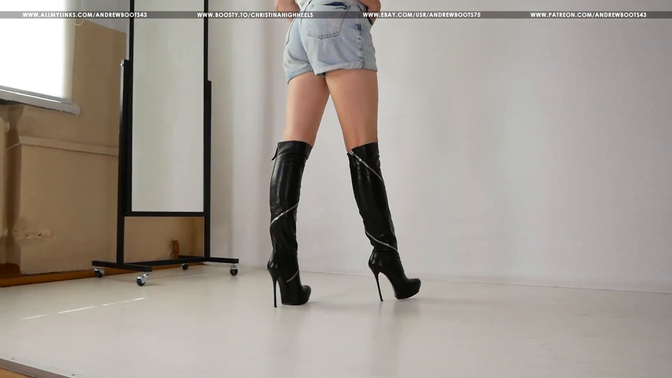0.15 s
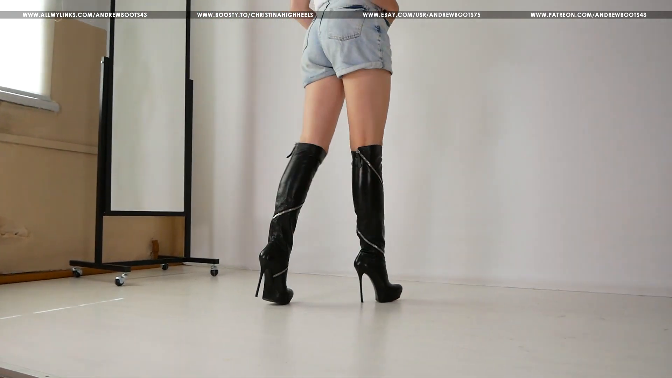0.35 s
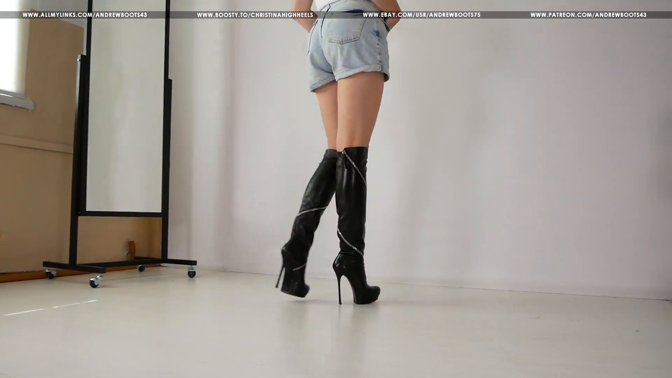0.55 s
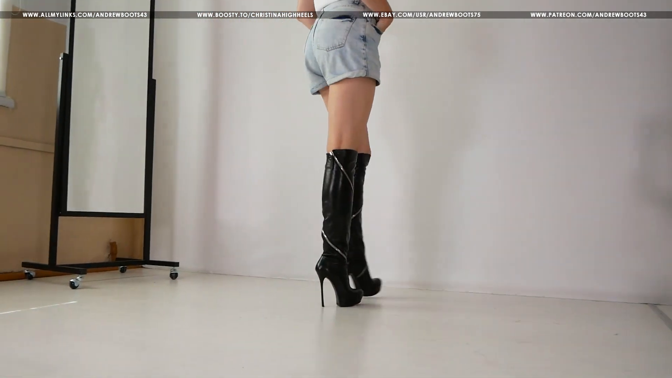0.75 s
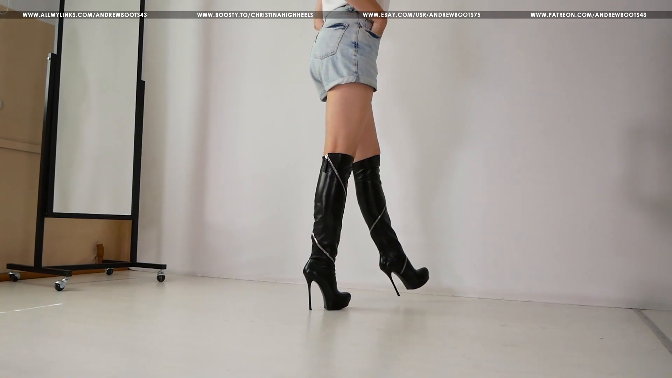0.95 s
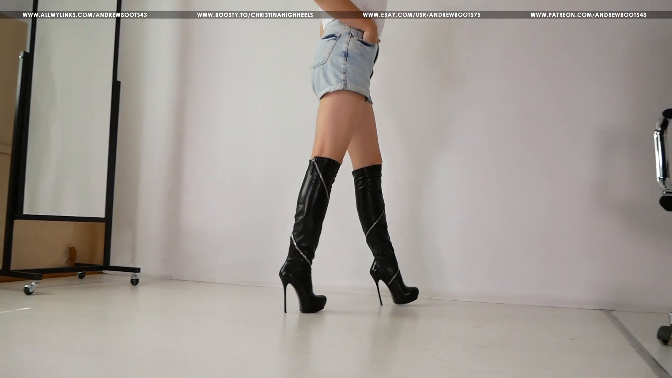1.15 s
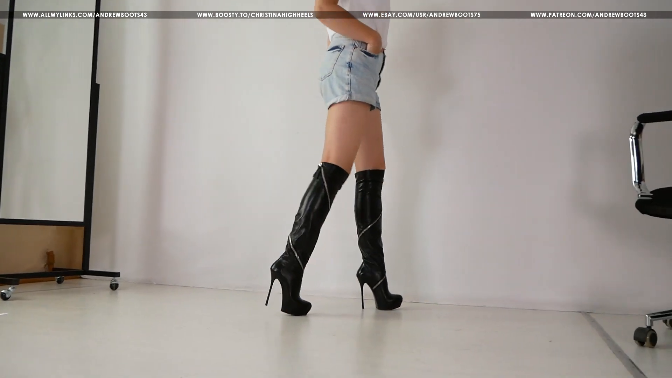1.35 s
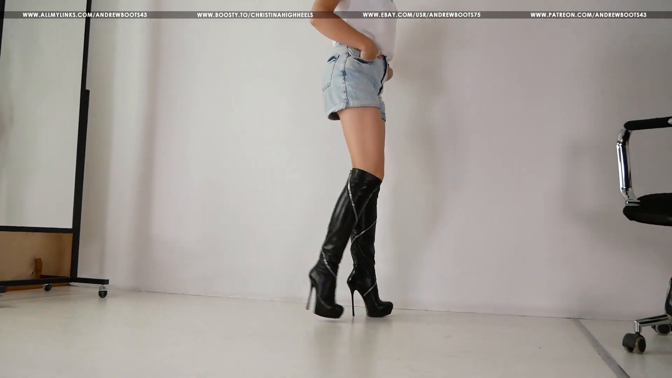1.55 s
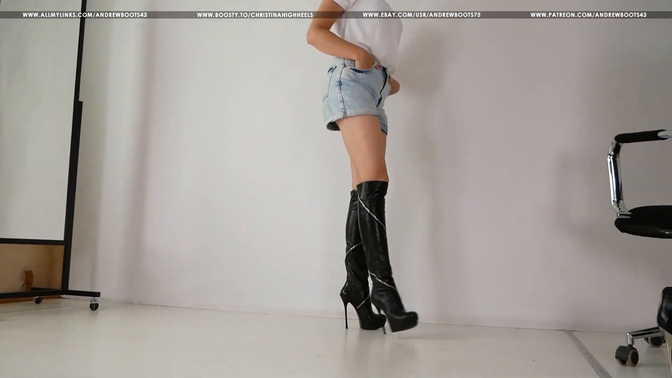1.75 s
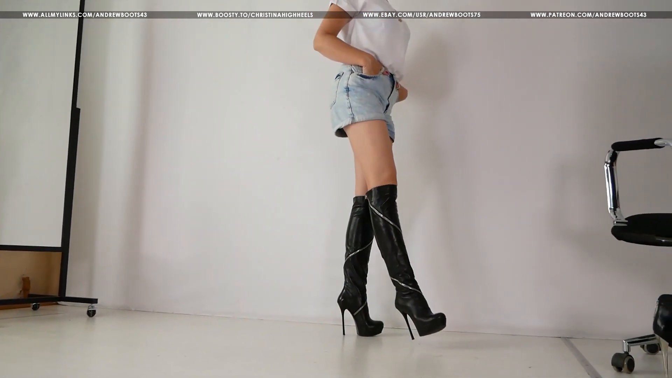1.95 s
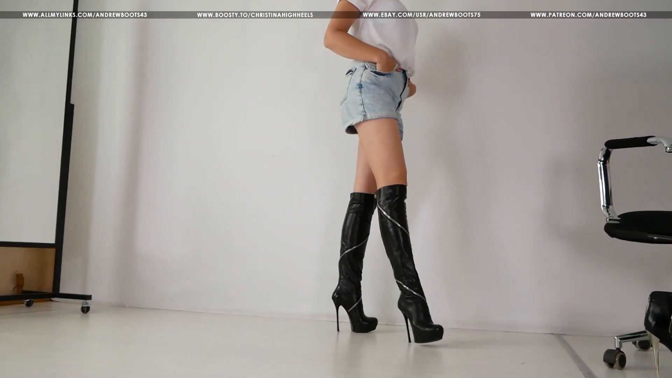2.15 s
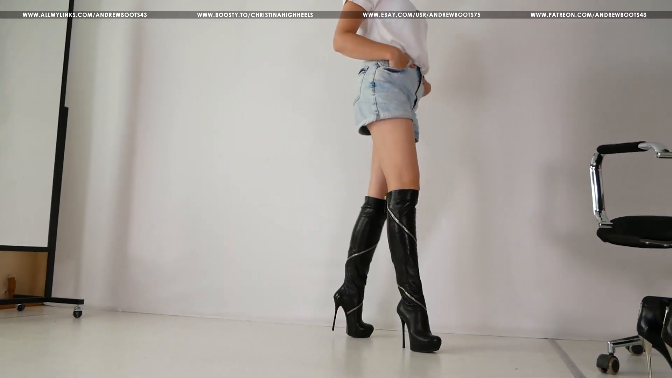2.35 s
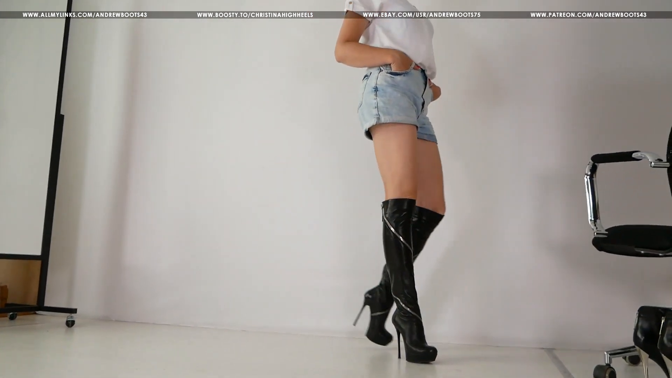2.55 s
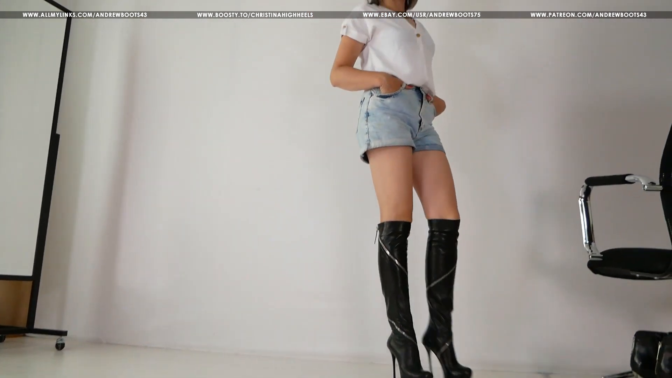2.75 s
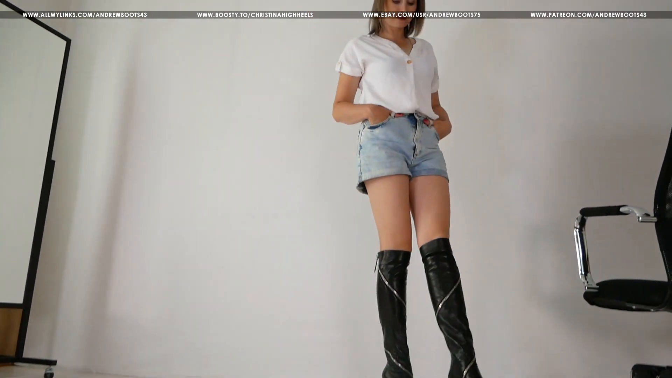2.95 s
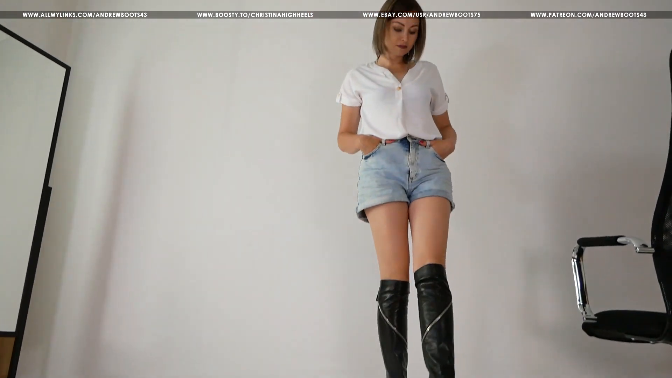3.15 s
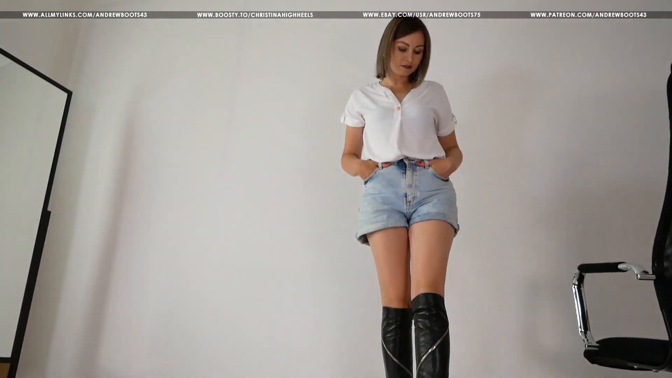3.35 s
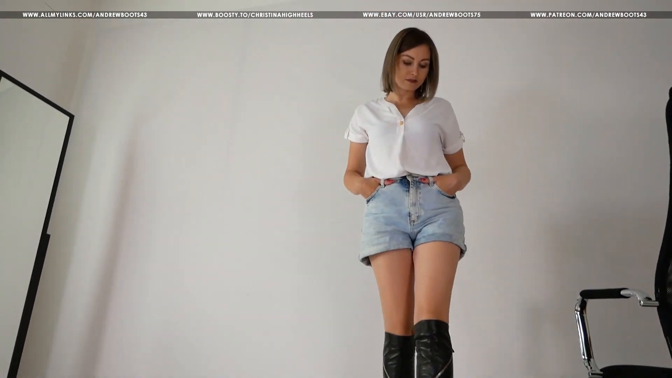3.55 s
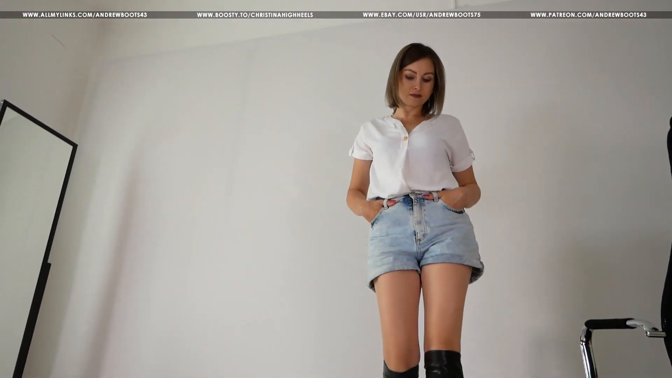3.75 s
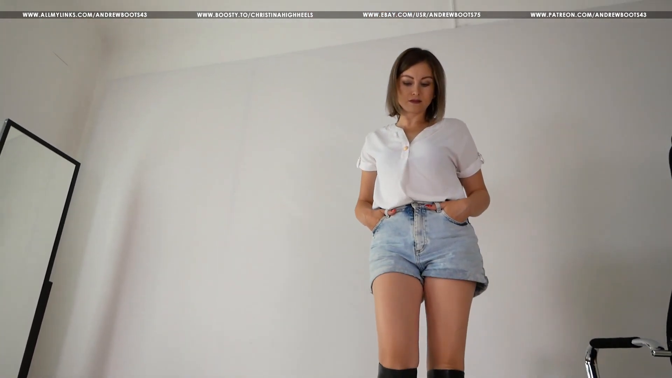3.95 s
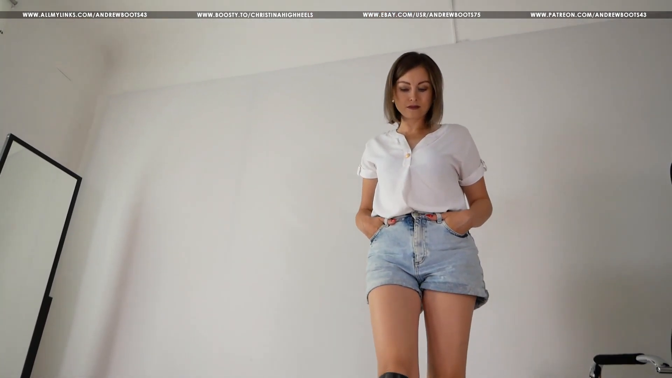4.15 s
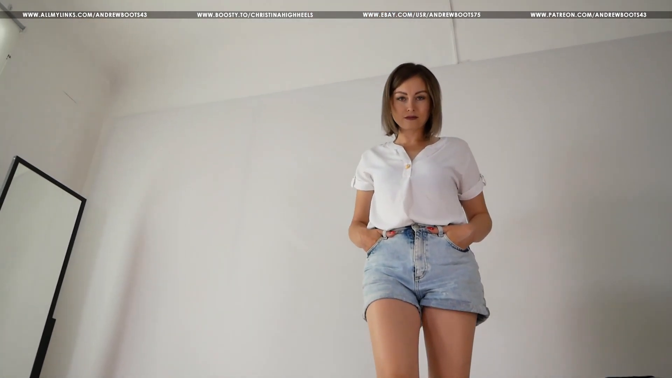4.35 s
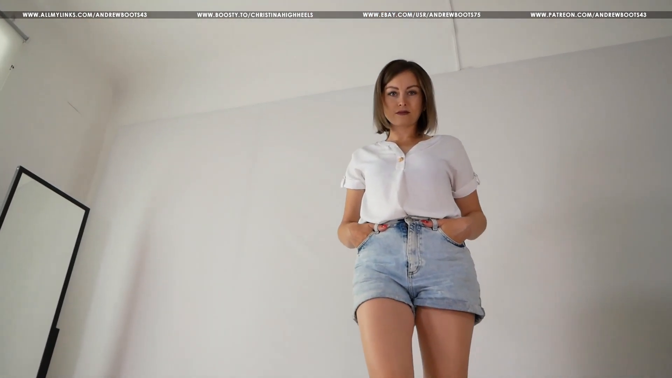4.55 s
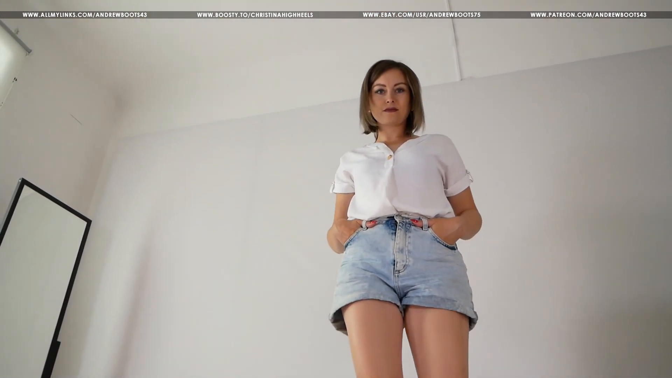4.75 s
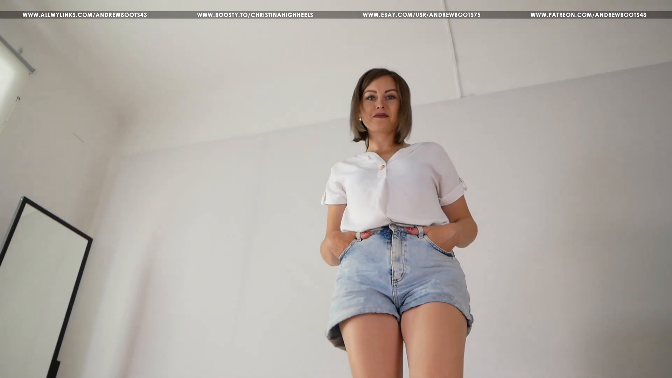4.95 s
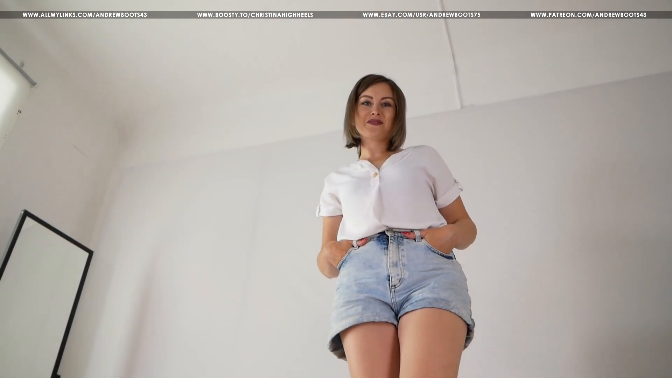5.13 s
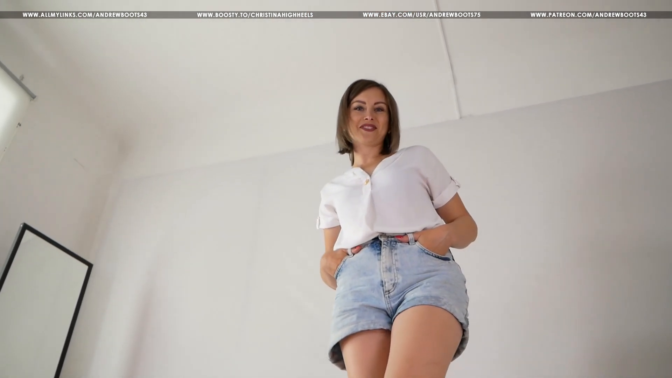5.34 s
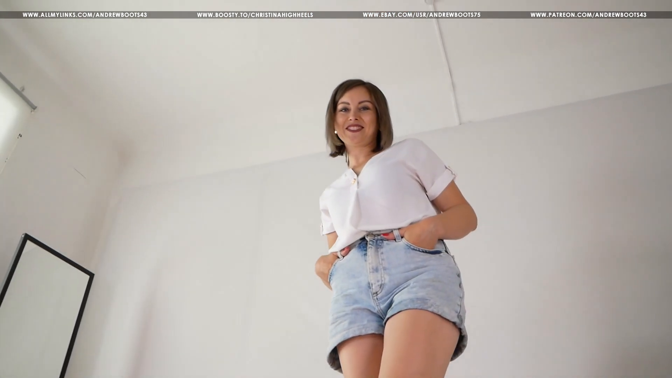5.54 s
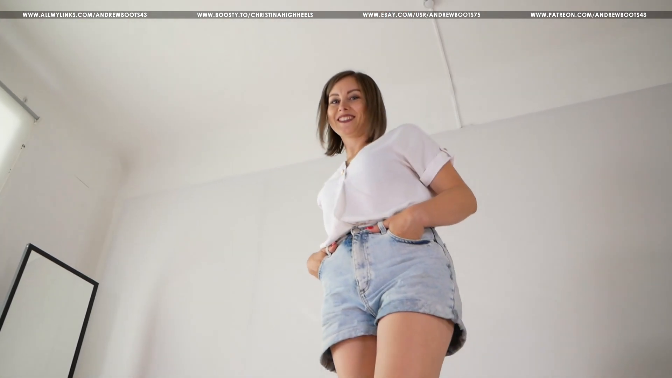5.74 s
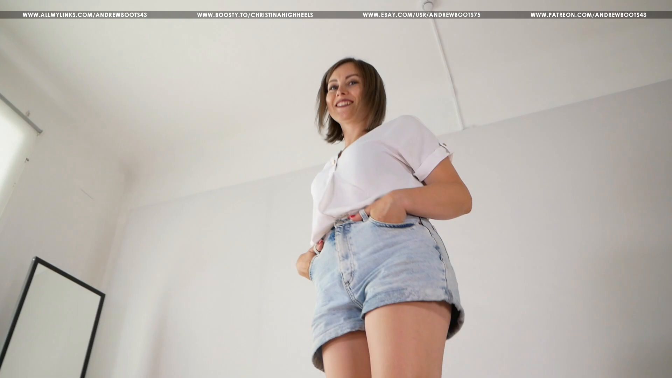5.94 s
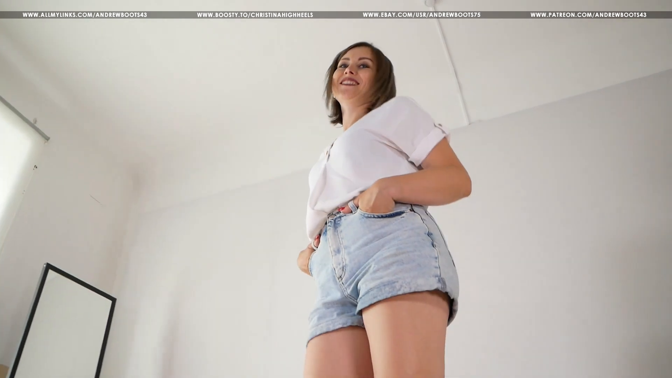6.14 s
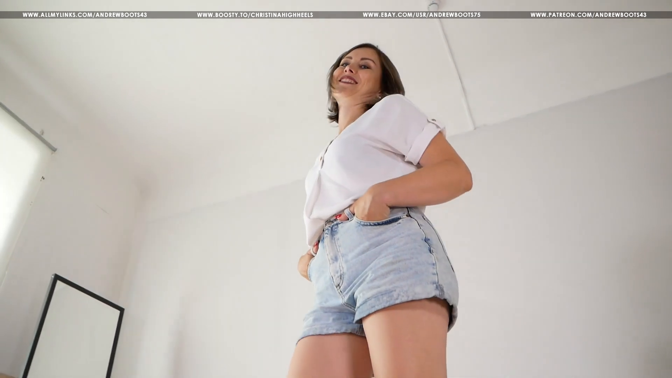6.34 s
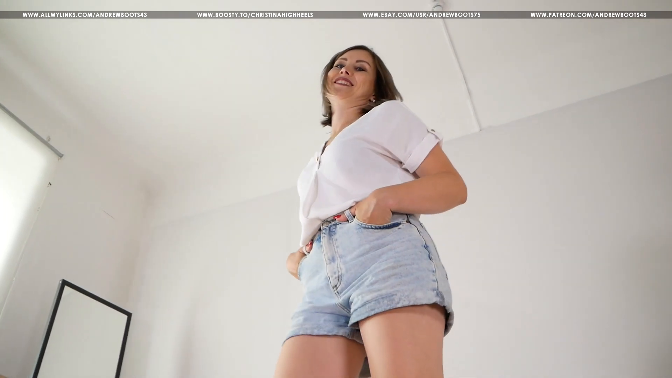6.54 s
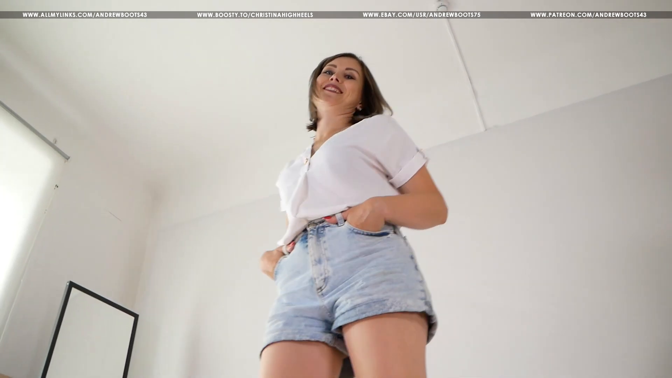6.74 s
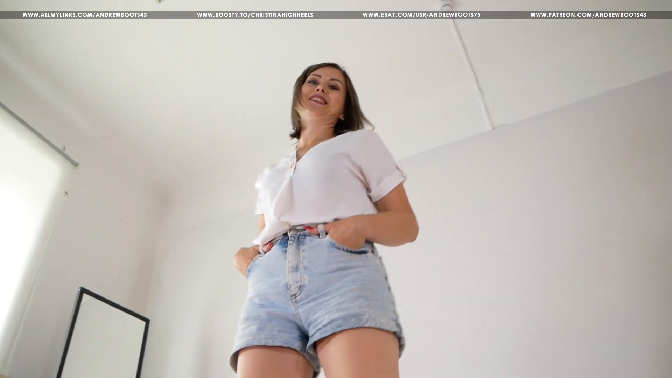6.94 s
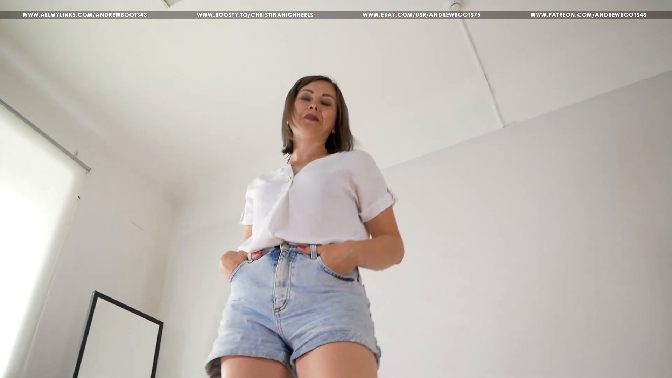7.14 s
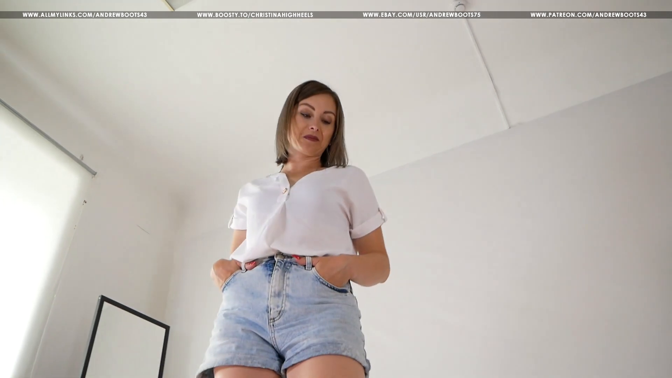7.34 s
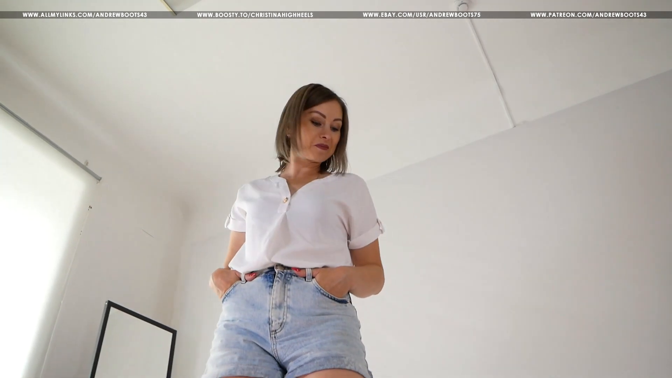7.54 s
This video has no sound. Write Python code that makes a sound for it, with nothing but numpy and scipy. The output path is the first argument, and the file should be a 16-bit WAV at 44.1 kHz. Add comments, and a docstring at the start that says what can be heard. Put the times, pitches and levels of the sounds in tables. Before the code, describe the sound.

A large bare room with hard walls, a soft low air tone and faint hiss. A stiletto heel strikes the hard floor at 0.2 s: sharp click, hollow boot knock, low floor thump, then a dull sole slap about 0.1 s later and a ring fading over roughly a second. Leather rustles and hisses as the leg swings; at 1.0 s there is a tiny rough double squeak with a scuff. The second strike, at 1.2 s, is the farthest and boomiest. Further steps at 2.2, 3.5, 4.5, 5.6 and 6.8 s come progressively closer, with clearer attacks. A short scuff falls at 3.05 s, and small leather ticks scatter from 3.2 s, clustering around 5.0-5.4 s as the background dips slightly. Dull sole scuffs and a creasing rub come at 6.3 s, a faint tick at 6.6 s, and a last soft scuff at 7.5 s under the final step's fading echo.

```python
"""Seven slow steps in stiletto boots across a bare, echoing studio, closer and closer from the second on.
Each heel bends the hard floor: the wave arrives treble first as a quick falling chirp, the boot knocks,
the floor booms, the nearest walls answer, the sole follows, the room rings on.
Between the steps the boots tick, squeak and scuff: filtered noise bursts and a rough two-part note.
Clothes rustle, as grainy filtered noise, over a quiet room tone."""
import sys
import numpy as np
from scipy import signal
from scipy.fft import rfft, irfft, next_fast_len
from scipy.io import wavfile

SR = 44100
rng = np.random.default_rng(int(sys.argv[2]) if len(sys.argv) > 2 else 0)


def dump(signal):
    """Clip the signal to [-1, 1] and save it as 16-bit WAV at the path in sys.argv[1]."""
    limited = np.clip(np.atleast_2d(signal).T, -1, 1)
    pcm = np.round(limited * 32767).astype(np.int16)
    wavfile.write(sys.argv[1], SR, pcm)


N = 334719
TIME = np.arange(N) / SR
RING = 65536  # length of the room's answer in samples

# Heel strikes. Each row: start in s, distance in m, force in dB, crack in dB, contact corner in Hz,
# body in dB, direct sound in dB, floor thump in Hz, its boost in dB, heel shaft's upper ring in Hz,
# its boost in dB, lower ring in Hz, its boost in dB, next leg swing in dB.
HEEL_STRIKES = [ (0.1763, 3, 0, 2.5, 4440, -0.5, 1.5, 186, 12.5, 2680, 6, 2010, 6, -55),
                (1.1872, 4.7, -2, 11.5, 3940, 2.5, 0, 146, 15.5, 4100, 4.5, 2050, 6, -56.5),
                (2.2157, 3.5, -0.6, 2, 4200, -2, 2, 250, 5.5, 2760, 13.5, 2240, -1, -81),
                (3.483, 2.3, -4, -5.5, 4200, 4, -1, 199, 12, 2920, 10, 2230, 10, -68),
                (4.455, 1.83, -0.5, -3.5, 3400, -1, 2, 215, 4, 3010, 9.5, 2240, 4, -69),
                (5.6327, 1.34, -2.5, 4, 3800, -1, 1.5, 222, 8, 4170, 9, 3070, -1, -59),
                (6.7737, 1.29, 0.5, 1.5, 4080, 0.5, -0.5, 185, -2, 3700, 10, 2680, 4.5, -60)]
# Stereo width of the room's echoes. Each row: frequency in Hz, side minus mid in dB.
ECHO_SIDE = [(80, -16.5), (250, -8.5), (500, -8), (1000, -3), (2000, -1.5), (4000, -9.5), (9000, -14)]
# Stereo width of room tone and clothes. Each row: frequency in Hz, side minus mid in dB.
BACKGROUND_SIDE = [(60, -0.5), (250, 2), (1000, 0), (2500, -2.5), (5000, -12), (10000, -12.5)]


def undb(db):
    """Decibels to gain."""
    return 10 ** (np.asarray(db) / 20)


def freqs(size):
    """Frequencies of a spectrum in Hz, kept at 1 or more."""
    return np.maximum(np.arange(size // 2 + 1) * SR / size, 1)


def read(points, hz):
    """Join (Hz, value) points on a log-frequency axis."""
    at_hz, value = np.transpose(points)
    return np.interp(np.log(hz), np.log(at_hz), value)


def unit(x):
    """Scale to rms 1."""
    return x / np.sqrt(np.mean(x ** 2))


def tint(x, colour):
    """Filter by a (Hz, dB) curve."""
    size = x.shape[-1]
    padded = next_fast_len(size + 2048)
    spectrum = rfft(x, padded) * undb(read(colour, freqs(padded)))
    return irfft(spectrum, padded)[..., :size]


def stereo_noise(size, side_db):
    """Noise whose left and right differ by a side spectrum."""
    mid = rng.standard_normal(size)
    side = tint(rng.standard_normal(size), side_db)
    return mid + side * np.array([[1], [-1]])


def resonate(x, hz, q):
    """One broad resonance, passed twice; Q is at least 0.6 per pass."""
    b, a = signal.iirpeak(min(hz, SR / 4), max(q, 0.6), fs=SR)
    return signal.lfilter(b, a, signal.lfilter(b, a, x))


def peak(hz, centre_hz, width_hz, db):
    """Gain of one resonance standing out of a flat response."""
    return np.sqrt(1 + (undb(db) ** 2 - 1) / (1 + (2 * (hz - centre_hz) / width_hz) ** 2))


def causal(gain):
    """Spectrum of the promptest (minimum-phase) pulse with this magnitude."""
    cepstrum = irfft(np.log(gain))
    half = len(cepstrum) // 2
    folded = np.r_[cepstrum[0], 2 * cepstrum[1:half], np.zeros(half)]
    return np.exp(rfft(folded))


def wander(rate_hz):
    """Random curve through normal knots at a given rate."""
    knots = rng.standard_normal(int(N / SR * rate_hz) + 2)
    return np.interp(TIME * rate_hz, np.arange(len(knots)), knots)


def swell(centre_s, length_s):
    """Smooth bump around a moment, down to exp(-2) one length away."""
    return np.exp(-2 * ((TIME - centre_s) / length_s) ** 2)


def add(out, start_s, x):
    """Mix a sound in from a given moment."""
    start = max(int(start_s * SR), 0)
    out[..., start:start + x.shape[-1]] += x[..., :N - start]


def at_distance(metres, db, db_per_doubling, reference_m=2.4):
    """Level in dB that changes evenly with each doubling of the distance."""
    return db + db_per_doubling * np.log2(metres / reference_m)


def standstill(centre_s=5.32, length_s=0.4, dip_db=-2.7):
    """Gain of room tone and leather rustle, which sinks as the walker is still for a moment."""
    return undb(dip_db * swell(centre_s, length_s))


def room_tone(level_db=-47.5, waver_db=0.6):
    """Soft, nearly steady air of the room with the microphones' hiss: coloured noise."""
    # Each row: frequency in Hz, level in dB.
    tone_colour = [(15, -69.5), (25, -46.5), (81, -2), (117, -9), (144, 1.5), (263, -0.5), (325, 1.5),
                   (411, -2), (481, 2.5), (534, 0.5), (1300, -7), (1880, -19.5), (4000, -39.5), (9750, -32),
                   (13000, -55)]
    air = unit(tint(stereo_noise(N, BACKGROUND_SIDE), tone_colour))
    return air * undb(level_db) * undb(waver_db * wander(5))


def swings(after_s=0.61, length_s=0.43):
    """Speed of the swinging leg as a gain: one smooth swell after each heel strike."""
    return sum(undb(swing_db) * swell(s + after_s, length_s) for s, *_, swing_db in HEEL_STRIKES)


def clothes(grain_db=1.0, swing_brush_db=-21):
    """Grainy leather rustle swells with each swing; brighter swishes where denim brushes past."""
    # Turns and hip shifts. Each row: centre in s, level in dB, length in s.
    swish_rows = [(0.26, -62.5, 0.05), (0.897, -70, 0.04), (1.43, -67, 0.053), (2.717, -70, 0.16),
                  (3.286, -62, 0.15), (4.6, -70, 0.026), (5.493, -65, 0.03), (6.17, -64, 0.035),
                  (7.12, -72, 0.12)]
    # Each row: frequency in Hz, level in dB.
    swish_colour = [(2000, -35), (4000, 2.5), (7000, -9), (10000, -4.5), (12500, -28.5)]
    # Each row: frequency in Hz, level in dB.
    rustle_colour = [(500, -9.5), (1200, -2), (1900, -3.5), (3100, 2), (4200, -4), (5200, -8.5),
                     (6200, -13), (9000, -20.5), (12000, -32.5)]
    hush_before_s, hush_length_s, hush_db = 0.12, 0.15, -0.68
    brush_after_s, brush_length_s, brush_db, brush_db_per_doubling = 0.22, 0.35, -69, 1.6
    rustle_db, rustle_db_per_s = -55, -0.77

    fibres = stereo_noise(N, BACKGROUND_SIDE) * undb(grain_db * wander(600))
    # the leg slows just before the heel lands
    hush = sum(swell(s - hush_before_s, hush_length_s) for s, *_ in HEEL_STRIKES)
    steady = standstill() * undb(hush_db * hush) * undb(rustle_db + rustle_db_per_s * TIME)
    swishes = sum(undb(db) * swell(s, length_s) for s, db, length_s in swish_rows)
    landings = 0
    for s, metres, *_ in HEEL_STRIKES:
        landing_db = at_distance(metres, brush_db, brush_db_per_doubling)
        landings = landings + undb(landing_db) * swell(s + brush_after_s, brush_length_s)
    swinging = swings()
    leather = np.linalg.norm([steady, swinging, swishes], axis=0)  # powers add
    brushing = swishes + landings + undb(swing_brush_db) * swinging
    brushing = brushing * undb(1.5 * wander(15))
    rustle = leather * unit(tint(fibres, rustle_colour))
    return rustle + brushing * unit(tint(fibres, swish_colour))


def strike_spectrum(bass_db, crack_db, corner_hz, delay_s, bass_hz=400, crack_hz=1500, steepness=4.77):
    """One blow, dulled by the contact time and spread into a falling chirp by the floor."""
    # Heel tip on the floor. Each row: frequency in Hz, level in dB.
    tip_colour = [(35, -13), (75, 12.5), (130, 29.5), (200, 32.5), (360, 31), (560, 26.5), (800, 21),
                  (1150, 16), (1650, 9), (2900, 3.5), (4200, -4), (6500, -11.5), (11000, -9.5)]
    # Boot and floor covering. Each row: centre in Hz, width in Hz, boost in dB.
    boot_modes = [(340, 19, 0.5), (559, 160, 3), (644, 29, 3.5), (743, 13, 1.5), (854, 114, 4),
                  (1153, 14, 0), (1890, 30, 0.5), (2270, 150, 4), (3240, 200, 2), (3700, 220, -0.5)]
    hz = freqs(RING)
    octaves_below = np.log2(np.clip(bass_hz / hz, 1, 8))
    db = read(tip_colour, hz) + bass_db * octaves_below + crack_db / (1 + (crack_hz / hz) ** 4)
    gain = undb(db) / np.sqrt(1 + (hz / corner_hz) ** (2 * steepness))
    for mode in boot_modes:
        gain = gain * peak(hz, *mode)
    # bending waves travel at a speed that grows with the root of frequency; delay_s holds at 1 kHz
    bending = np.exp(-4j * np.pi * delay_s * np.sqrt(1000 * hz))
    return causal(gain) * bending


def shaft_rings(upper_hz, upper_db, lower_hz, lower_db):
    """Gain of the thin heel shaft's two rings and the hollow below the upper one."""
    hz = freqs(RING)
    upper = peak(hz, upper_hz, 0.06 * upper_hz, upper_db)
    lower = peak(hz, lower_hz, 0.075 * lower_hz, lower_db)
    hollow = peak(hz, 0.62 * upper_hz, 0.27 * upper_hz, -0.95 * upper_db)
    return upper * lower * hollow


def scatter(db=-7, decay_s=0.0018, rise_s=0.013, low_hz=500):
    """Spectrum of the first few milliseconds of echoes from the boots and nearby furniture."""
    t = np.arange(RING // 8) / SR
    envelope = np.exp(-t / decay_s) * (1 - np.exp(-t / rise_s))
    envelope /= np.linalg.norm(envelope)
    echoes = rfft(stereo_noise(len(t), ECHO_SIDE) * envelope, RING)
    # long waves pass small things by
    return undb(db) * echoes / (1 + low_hz / (1j * freqs(RING)))


def lumps(spacing_hz=22, lump_db=1.7):
    """Uneven spectrum of the room's modes, which crowd together here and leave gaps there."""
    hz = freqs(RING)
    knots = rng.standard_normal(int(hz[-1] / spacing_hz) + 2)
    curve = np.interp(hz / spacing_hz, np.arange(len(knots)), knots)
    return causal(unit(undb(lump_db * curve)))


def room(build_s=0.007, build_low_s=0.0013, hold_s=0.088):
    """Room's answer from one spot: bass builds first, treble gathers from the walls, then all fades."""
    # Each row: frequency in Hz, t60 in s.
    decay_times = [(80, 0.85), (210, 0.97), (560, 1.04), (1470, 1.23), (3880, 1.0), (9000, 1.5)]
    # Each row: frequency in Hz, level in dB.
    ring_colour = [(50, 4), (100, 4), (150, 2.5), (250, -0.5), (500, 1), (1000, -1.5), (2000, -0.5),
                   (3200, -1), (5000, 5), (9000, 15.5)]
    t, hz = np.arange(RING) / SR, freqs(RING)
    # early echoes are still single and uneven, later ones merge
    uneven = undb(3 * wander(700)[:RING] * np.exp(-t / 0.12))
    noise = rfft(stereo_noise(RING, ECHO_SIDE) * uneven)
    octaves = np.log2(np.clip(hz, 62.5, 8000) / 62.5)
    out = 0
    for octave in range(8):
        centre_hz = 62.5 * 2 ** octave
        build = read([(200, build_low_s), (2000, build_s)], centre_hz) + 1e-4
        # the decay sets in once the first echoes have crossed the room
        fade = np.exp(-np.log(1000) * np.hypot(t, hold_s) / read(decay_times, centre_hz))
        envelope = (1 - np.exp(-t / build)) * fade
        band = irfft(noise * np.maximum(1 - abs(octaves - octave), 0))
        out = out + band * envelope / np.linalg.norm(envelope)
    return tint(irfft(rfft(out) * lumps()), ring_colour)


def reverberate(blow, gain_db, treble_db, first_hz, first_db, second_hz, second_db, dead_hz, dead_db,
                treble_hz=1300, standing_width_hz=65, dead_width_hz=50):
    """Room's ring from one spot: two standing waves are fed most, modes with a node there are missed."""
    hz = freqs(RING)
    first = peak(hz, first_hz, standing_width_hz, first_db)
    second = peak(hz, second_hz, standing_width_hz, second_db)
    dead = peak(hz, dead_hz, dead_width_hz, dead_db)
    tilt = undb(gain_db + treble_db / (1 + (treble_hz / hz) ** 4))
    pulse = irfft(blow * causal(first * second * dead * tilt))[None, :RING // 4]
    return signal.fftconvolve(room(), pulse, axes=1)


def boom(pitch_hz, rise_s):
    """The floor's low modes as decaying sines, pitched differently at each spot."""
    # Each row: multiple of the boom's pitch, level in dB, t60 in s.
    floor_modes = [(1.001, -20, 0.75), (1.189, -10.5, 0.14), (1.58, -15.5, 0.075)]
    t = np.arange(RING) / SR
    modes = 0
    for multiple, db, t60_s in floor_modes:
        decay = np.exp(-np.log(1000) * t / t60_s)
        modes = modes + undb(db) * np.sin(2 * np.pi * multiple * pitch_hz * t) * decay
    return modes * (1 - np.exp(-t / rise_s))


def steps(dip_q=0.77, thump_q=5.1, shaft_in_room=0.18, bending_s_per_m=0.0004405):
    """Each strike comes straight to the microphones, off the nearest walls and through the room."""
    # Floor and room at each strike. Each row: room in dB, room treble in dB, standing wave in Hz,
    # its boost in dB, second one in Hz, its boost in dB, dead zone in Hz, its boost in dB,
    # floor boom in Hz, boom in dB, boom rise in s.
    spot_rows = [ (0.5, 1, 258, 4, 650, 1, 358, -6, 220, -8, 0.046),
                 (0.5, 1.5, 205, 4, 455, 3.5, 234, -6.5, 110, -2, 0.094),
                 (-0.5, 1, 180, 2.5, 490, 2.5, 285, 2.5, 138, -0.5, 0.025),
                 (0.5, 1.5, 345, 0, 500, 0, 230, -1, 160, 0.5, .05),
                 (0, 2, 275, -0.5, 570, 3.5, 380, -8, 160, -0.5, 0.077),
                 (-1.5, 2, 283, 4, 538, 5, 380, -5, 140, -8.5, 0.077),
                 (-0.5, -1, 270, 3, 600, 2.5, 307, -12, 150, -1, 0.089)]
    # Walls and furniture. Each row: step number from 0, delay in s, level in dB, centre in Hz, Q.
    echo_rows = [(0, 0.036, -12, 283, 1.2), (0, 0.075, -5, 600, 0.8), (1, 0.0084, -5.5, 230, .8),
                 (1, 0.030, -4, 760, 1.4), (1, 0.014, -7, 2300, .9), (2, 0.014, -4, 650, 1.7),
                 (2, 0.0159, 3, 160, 1.3), (2, 0.045, -10, 2700, 1.2), (3, 0.004, -5, 400, 2.4),
                 (3, 0.01033, 1.5, 420, 1), (3, 0.030, 1, 530, 1.5), (4, 0.035, -7, 483, 1),
                 (6, 0.0129, -5, 260, 1.1)]
    # Hollow boot, facing the microphones. Each row: centre in Hz, width in Hz, boost in dB.
    knock_modes = [(299, 52, -2), (530, 79, 3), (694, 110, -4), (785, 66, 0.5), (1000, 100, -18),
                   (1143, 38, 8), (1830, 58, 4.5)]
    out, hz = np.zeros((2, N)), freqs(RING)
    knock = np.prod([peak(hz, *mode) for mode in knock_modes], axis=0)
    for number, (step, place) in enumerate(zip(HEEL_STRIKES, spot_rows)):
        (s, metres, force_db, crack_db, corner_hz, body_db, direct_db,
         thump_hz, thump_db, *rings, _) = step
        *acoustics, boom_hz, boom_db, rise_s = place
        arrival_db = at_distance(metres, -2.53, -4)
        bass_db = at_distance(metres, -0.5, 3.3)  # per octave down into the bass
        room_db = at_distance(metres, 2.94, 1.47)

        # a spectral dip moves up with distance; the body is the knock's broad middle
        dip_hz = 830 * (metres / 2.4) ** 1.32
        spot = causal(peak(hz, dip_hz, dip_hz / dip_q, -3.5) * peak(hz, 800, 230, body_db))
        strike = strike_spectrum(bass_db, crack_db, corner_hz, bending_s_per_m * metres)
        blow = undb(force_db + arrival_db) * spot * strike

        # close by, the boot knocks, the floor under the foot thumps, the heel shaft rings briefly
        shaft = shaft_rings(*rings)
        local = causal(knock * shaft * peak(hz, thump_hz, thump_hz / thump_q, thump_db))
        direct = irfft(blow * local * (1 + scatter()))[:, :RING // 4]
        ringing = reverberate(blow * causal(shaft ** shaft_in_room), *acoustics)
        add(out, s, undb(direct_db) * direct)
        add(out, s + 0.003, undb(room_db) * ringing)
        add(out, s + 0.0031, undb(boom_db) * boom(boom_hz, rise_s))
        for which, after_s, echo_db, echo_hz, q in echo_rows:
            if which == number:
                echo = irfft(blow * (1 + scatter()))[:, :RING // 8]
                add(out, s + after_s, undb(echo_db) * resonate(echo, echo_hz, q))
    return out


def soles(delay_s=0.0008, room_db=-5, bass_db=1.2):
    """The broad rubber platform lands after the heel: dull slap and floor thump, with no crack."""
    # Each row: start in s, level in dB, contact corner in Hz, thump in Hz, its boost in dB.
    sole_rows = [(0.311, -16.5, 423, 288, 12), (1.279, -5.5, 230, 152, 8), (2.309, -14.5, 900, 170, 4),
                 (3.5618, -13, 480, 195, 10), (4.573, -14.5, 526, 275, 5), (5.749, -17, 220, 170, 3),
                 (6.868, -8.5, 240, 149, 5.5)]
    out, hz = np.zeros((2, N)), freqs(RING)
    for s, db, corner_hz, thump_hz, thump_db in sole_rows:
        slap = undb(db) * strike_spectrum(bass_db, 0, corner_hz, delay_s, steepness=3.67)
        thump = causal(peak(hz, thump_hz, thump_hz / 5, thump_db))
        add(out, s, irfft(slap * thump)[:RING // 4])
        ringing = signal.fftconvolve(room(), irfft(slap)[None, :RING // 4], axes=1)
        add(out, s, undb(room_db) * ringing)
    return out


def creases(q=4.7, grain_db=2.0, patchy_db=2):
    """Folds of the boot legs rub in small fits as a knee bends, each hissing at its own pitch."""
    # Each row: centre in s, level in dB, length in s, pitch in Hz.
    crease_rows = [(.7, -59.5, 0.48, 4750), (1.85, -61, 0.17, 2850), (2.05, -65, 0.26, 4600),
                   (2.902, -67, 0.22, 3060), (3.65, -58, 0.11, 4400), (4.948, -69, 0.43, 4770),
                   (6.287, -61, .2, 2480), (6.28, -66, 0.2, 4900), (7.398, -68, 0.3, 2440)]
    friction = rng.standard_normal(N) * undb(grain_db * wander(300) + patchy_db * wander(13))
    out = 0
    for s, db, length_s, hz in crease_rows:
        out = out + undb(db) * swell(s, length_s) * unit(resonate(friction, hz, q))
    return out


def scuffs(q=2.23, swing_db=-4.5, swing_hz=330):
    """Uneven, dull friction of the platform soles: a little under each swing, more on a turn."""
    # Each row: centre in s, level in dB, length in s, pitch in Hz.
    scuff_rows = [(1.035, -51.5, 0.24, 355), (2.08, -50, 0.12, 330), (3.053, -47, 0.023, 705),
                  (6.273, -48.5, 0.22, 340), (6.386, -47.5, 0.038, 340), (7.507, -49, 0.066, 330)]
    friction = rng.standard_normal(N) * undb(3 * wander(90))
    out = undb(swing_db) * swings() * unit(resonate(friction, swing_hz, q))
    for s, db, length_s, hz in scuff_rows:
        out = out + undb(db) * swell(s, length_s) * unit(resonate(friction, hz, q))
    return out


def squeak(jitter=0.11, rough_db=3):
    """A sole sticks and slips as the foot turns: each stroke is a rough note and its octave."""
    # Each row: centre in s, level in dB, length in s, pitch in Hz, octave in dB.
    stroke_rows = [(0.9858, -40, 0.006, 765, -1), (0.9975, -39, 0.0055, 770, -8)]
    waver = 1 + jitter * wander(900)
    rough = undb(rough_db * wander(400))
    out = 0
    for s, db, length_s, hz, octave_db in stroke_rows:
        phase = 2 * np.pi * np.cumsum(hz * waver) / SR
        note = np.sin(phase) + undb(octave_db) * np.sin(2 * phase)
        out = out + undb(db) * swell(s, length_s) * unit(rough * note)
    return out


def ticks():
    """Tiny snaps of boot leather and zips: a click and a short crumble."""
    # Each row: start in s, peak before colouring in dB, centre in Hz, Q, t60 in s.
    tick_rows = [(3.1568, -40.5, 3500, 1.1, 0.023), (3.562, -34.5, 4300, 1.9, 0.011),
                 (4.0338, -42, 3420, 1.8, 0.016), (4.578, -36.5, 2970, 1.5, 0.0073),
                 (5.0473, -39, 2300, 0.39, 0.019), (5.078, -47, 5130, 4.4, 0.023),
                 (5.1510, -46, 4300, 2.7, 0.029), (5.2294, -31.5, 3050, 1.3, 0.0066),
                 (5.242, -48, 3900, 1.4, .011), (5.3026, -39.5, 3470, 2, 0.017),
                 (5.428, -39, 730, 1.6, 0.017), (5.429, -51, 4800, 8.8, 0.036),
                 (6.582, -45, 4270, 3.1, 0.016)]
    # Dry below, airy on top. Each row: frequency in Hz, level in dB.
    tick_colour = [(4800, -0.5), (6300, -7.5), (8000, -4), (11000, -2.5)]
    out, t = np.zeros(N), np.arange(RING // 8) / SR
    for s, db, hz, q, t60_s in tick_rows:
        crumble = rng.standard_normal(len(t)) * np.exp(-np.log(1000) * t / t60_s)
        click = 3 * (t == 0)
        snap = resonate(crumble + click, hz, q)
        add(out, s, undb(db) * snap / abs(snap).max())
    return tint(out, tick_colour)


def scene(small_room_db=-6):
    """Steps and the small sounds of walking in one room."""
    small = scuffs() + squeak() + ticks()
    echo = signal.fftconvolve(room(), small[None], axes=1)[:, :N]
    background = standstill() * room_tone() + clothes() + creases()
    return background + steps() + soles() + small + undb(small_room_db) * echo


def record(dry, notch_hz=7950, notch_q=13.2, top_hz=12400):
    """Narrow treble notch, full-scale clipping, then a steep top cut."""
    notched = signal.lfilter(*signal.iirnotch(notch_hz, notch_q, fs=SR), dry)
    top_cut = signal.ellip(8, 0.2, 70, top_hz, fs=SR, output="sos")
    return signal.sosfilt(top_cut, np.clip(notched, -1, 1))


dry = scene()
out = record(dry)
dump(out)
```